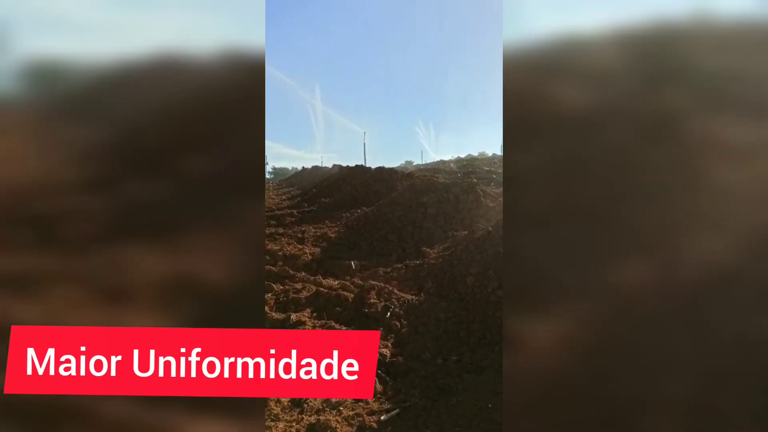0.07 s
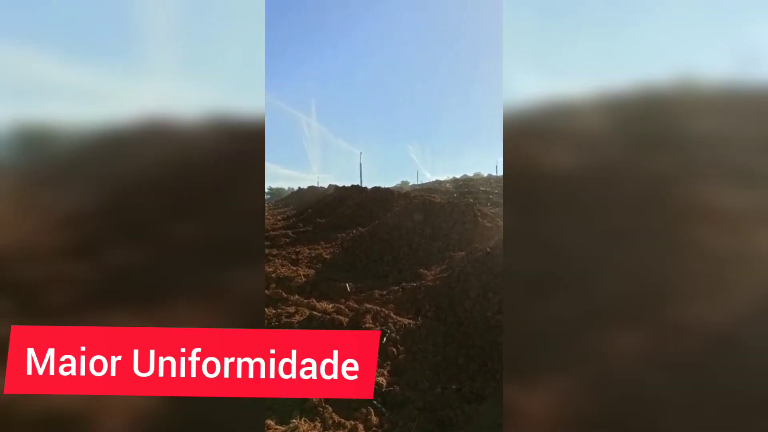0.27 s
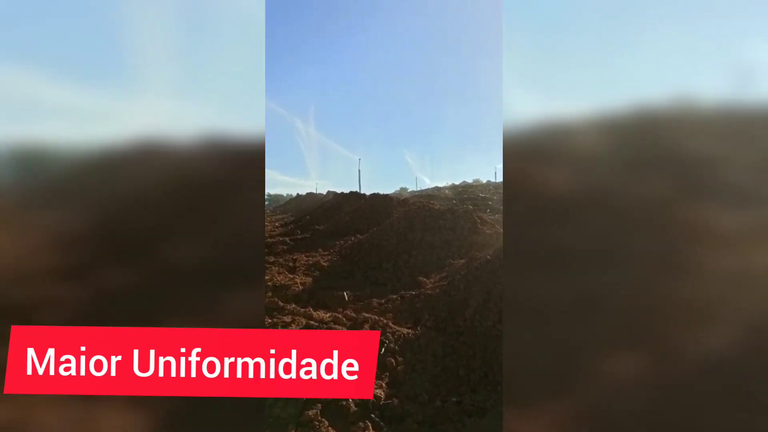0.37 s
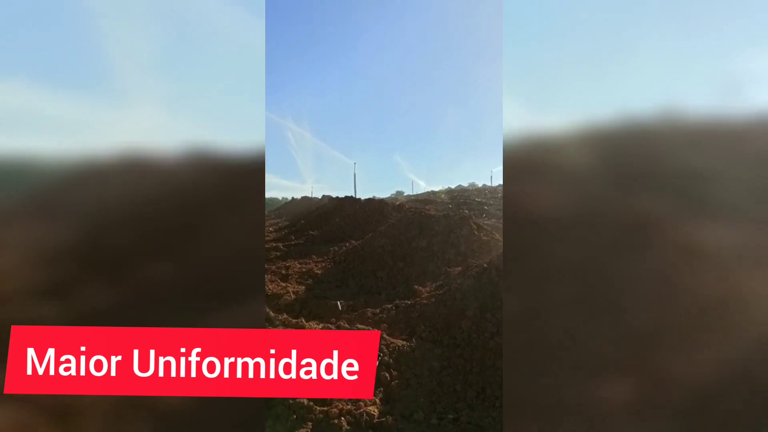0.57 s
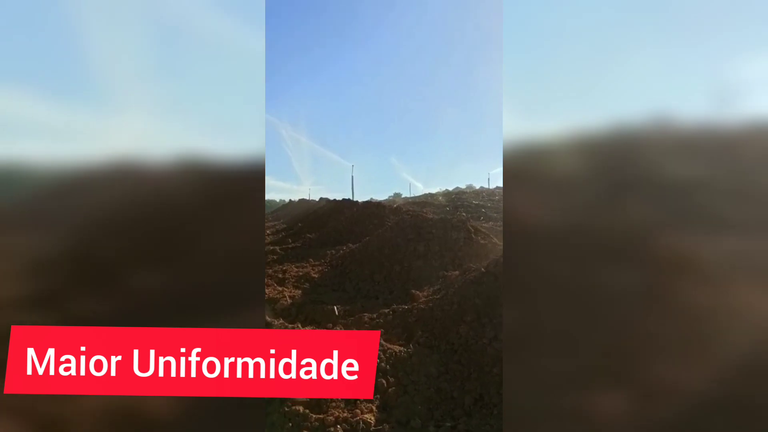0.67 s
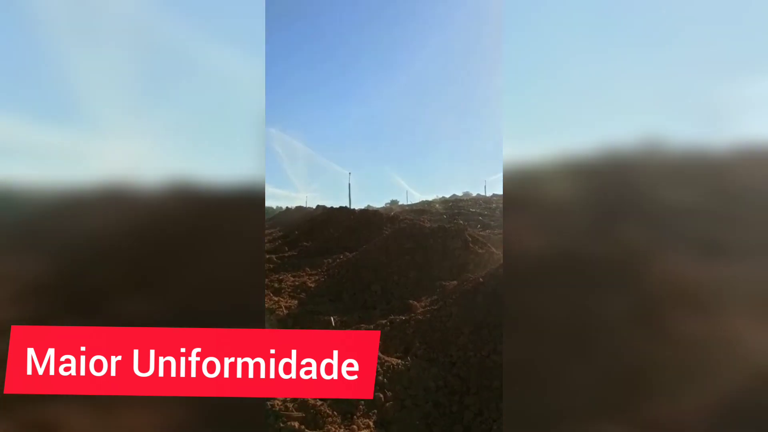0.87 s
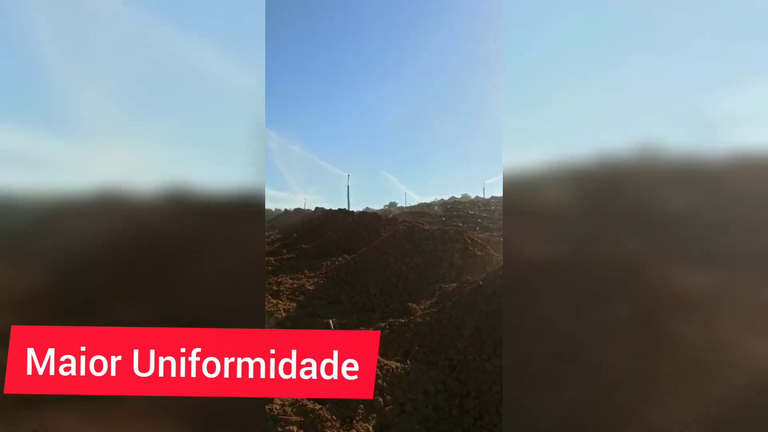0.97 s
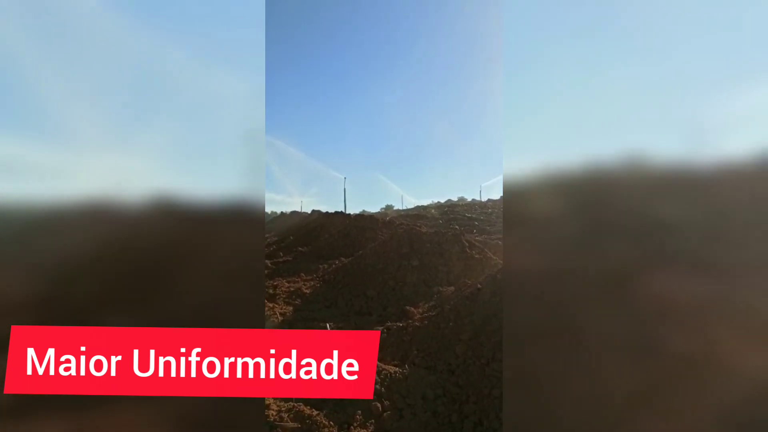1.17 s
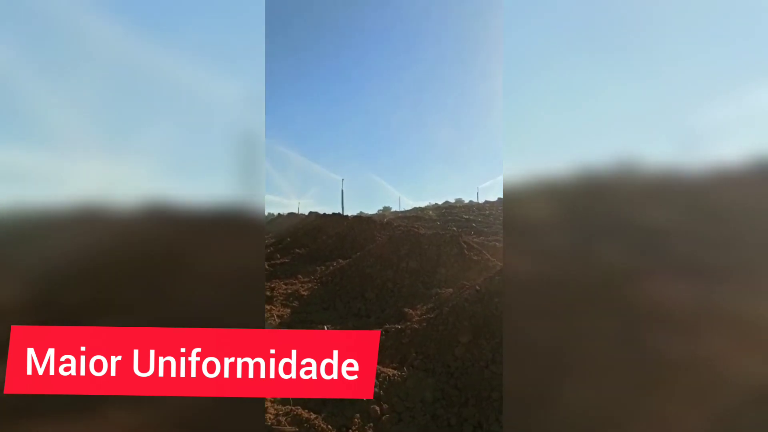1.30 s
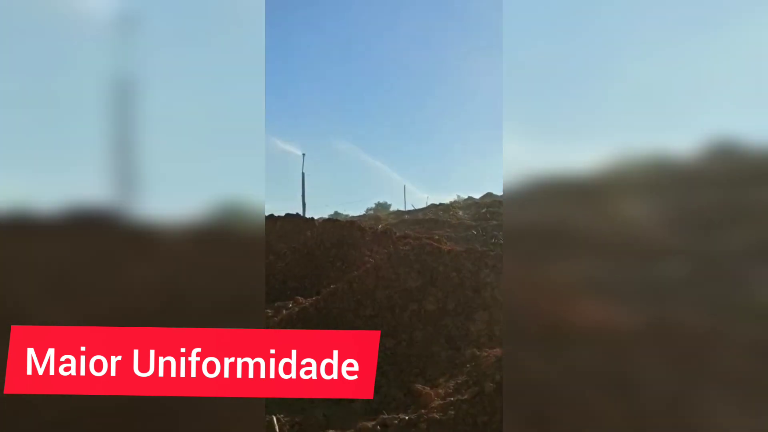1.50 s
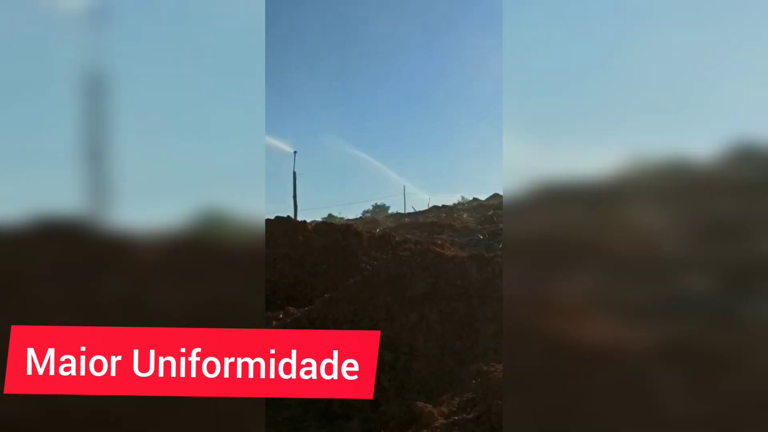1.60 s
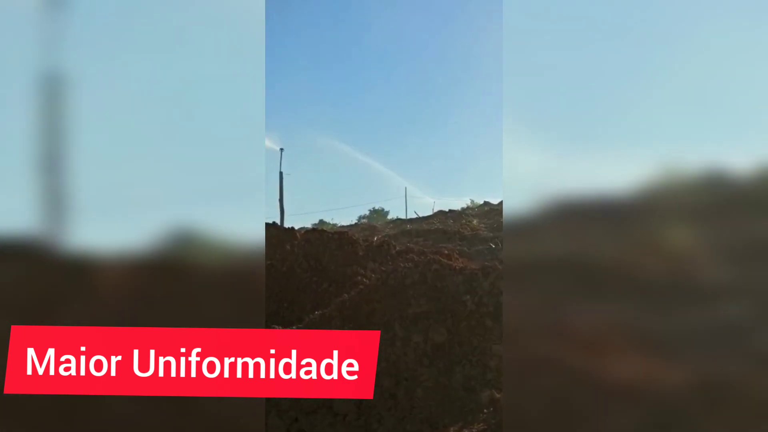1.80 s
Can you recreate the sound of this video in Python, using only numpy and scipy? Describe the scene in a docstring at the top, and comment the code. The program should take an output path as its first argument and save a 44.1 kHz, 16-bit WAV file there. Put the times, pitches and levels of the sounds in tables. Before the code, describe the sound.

An impact sprinkler hisses in an open field, its arm slapping the jet with short ticks three times a second from 0.2 to 1.8 seconds. Bright spray sizzles for the first half second. At 0.2 seconds a finger thuds and rubs over the right microphone, leaving that side muffled with low rumble and small bumps, a stronger one at 1.1 seconds. The hiss swells slightly near the end.

```python
"""Impact sprinkler in a field

The jet hisses over open ground, and three times a second the swinging arm slaps through it.
A bright spray sizzles for the first half second. A finger slides over the right microphone and
stays there, so that side goes dull, leaving the hand's bumps and low rumble over a faint hiss."""
import sys
import numpy as np
from scipy.fft import rfft, irfft
from scipy.io import wavfile

SR = 44100
rng = np.random.default_rng(int(sys.argv[2]) if len(sys.argv) > 2 else 0)


def file_out(sig):
    """Save sig as 16-bit WAV at sys.argv[1]."""
    # one column per channel
    cols = np.atleast_2d(sig).T
    # limit, then scale
    lim = np.clip(cols, -1, 1)
    pcm = np.round(lim * 32767).astype(np.int16)
    wavfile.write(sys.argv[1], SR, pcm)


N = 81585
T = np.arange(N) / SR
HZ = np.maximum(np.arange(N // 2 + 1) * SR / N, 1)

# Tone of the field's air and of each water layer. Each row: frequency in Hz, level in dB.
FIELD_EQ = [(20, -100), (45, -119), (70, -95), (100, -84.5), (200, -81.5), (330, -81), (600, -83.5),
            (900, -83), (1200, -87), (1700, -86), (2300, -91), (4000, -90), (9000, -108)]
JET_EQ = [(1500, -105), (2800, -98), (3500, -93), (4650, -90.5), (4950, -100.5), (5800, -92.5), (6400, -87),
          (7500, -85.5), (8500, -88.5), (11700, -95.5), (13200, -92.5), (15700, -95)]
SPRAY_EQ = [(2500, -105), (3400, -86), (4400, -84), (5100, -85.5), (6000, -81.5), (6400, -78.5),
            (7400, -70), (7900, -74), (8450, -76), (11700, -77), (13100, -74.5), (14200, -79), (15700, -80)]
SLAP_EQ = [(200, -98), (500, -76), (1000, -80.5), (2400, -80.5), (3300, -71), (4500, -68.5), (5000, -69.5),
           (5600, -70.5), (6400, -66), (7600, -69), (8500, -71.5), (11700, -84), (15700, -80)]
SPIT_EQ = [(5000, -105), (8000, -93), (12000, -88), (15700, -90)]
# Narrow resonances in all the water. Each row: centre in Hz, width in Hz, boost in dB.
WATER_PEAKS = [(3250, 63, 3), (4530, 100, 3.5), (6457, 53, 6.5), (6686, 53, 7), (6910, 41, 2),
               (7520, 120, 3.5), (7650, 73, 2), (8250, 87, 5.5)]
# Fader rides for jet, spray and muffled hiss. Each row: time in seconds, level in dB.
JET_FADER = [(0, 2.5), (.17, 11), (.23, 10), (.5, 2.5), (.58, 2), (1.05, 1.5), (1.4, 3), (1.7, 5.5),
             (1.85, 7)]
SPRAY_FADER = [(0, 0), (.24, -2), (.35, 2), (.515, 0.5), (.55, -30), (.65, -48), (1.85, -40)]
MUFFLED_FADER = [(0, 2), (.45, -9), (.6, -5), (.9, 0), (1.3, -0.5), (1.85, -1)]
# Cues for the arm's slaps and spits and the grip's rustles. Each row: start in seconds, level in dB.
SLAP_CUES = [(0.176, -5.5), (0.5195, -2.5), (0.853, -3.5), (1.1808, -3.5), (1.5187, -3.5), (1.837, -3.5)]
SPIT_CUES = [(.686, -0.5), (.862, 1), (1.013, 3.5), (1.674, 11.5)]
RUSTLE_CUES = [(0.166, 3.5), (0.861, 2.5), (.95, 2.5), (1.07, 7.5), (1.118, 2.5)]
# Tone of the muffled hiss and of each hand noise. Each row: frequency in Hz, level in dB.
MUFFLED_EQ = [(300, -98), (1000, -102), (2700, -108), (4600, -106), (5000, -116), (5900, -115),
              (6400, -110), (8400, -117), (11700, -113), (13200, -108), (14700, -106), (15700, -111)]
RUSTLE_EQ = [(40, -96), (100, -84), (250, -70), (450, -80), (900, -84), (2000, -100)]
RUMBLE_EQ = [(20, -118), (45, -86), (68, -63.5), (90, -62.5), (115, -66.5), (150, -75), (230, -79.5),
             (380, -91.5), (550, -94), (1000, -104), (3000, -120)]
BRUSH_EQ = [(100, -65), (350, -53), (700, -63), (1200, -68), (2000, -69.5), (4500, -74.5), (8000, -108),
            (15000, -105)]
RUB_EQ = [(25, -77), (60, -45), (110, -49), (200, -51), (350, -57.5), (600, -67.5), (1000, -80),
          (2000, -96.5), (5000, -105), (12000, -122)]
SCUFF_EQ = [(100, -65), (250, -49.5), (700, -57), (1100, -70.5), (2000, -75.5), (4500, -85), (8000, -112),
            (15000, -122)]
# The finger bumps the microphone. Each row: start in seconds, thud level in dB, thud pitch in Hz,
# knock level in dB, scuff level in dB.
BUMP_CUES = [(0.2247, -1, 106, -16.5, 5), (.266, -25.5, 98, -29, -18), (.313, -19.5, 105, -42, -24),
             (0.395, -31, 105, -47, -26), (0.426, -25.5, 85.6, -48, -23.5), (0.557, -36.5, 93, -49, -41),
             (0.715, -34, 110, -48, -36), (0.836, -26, 91.3, -44, -30), (0.956, -33.5, 75, -55, -46),
             (1.091, -25, 99, -44, -38), (1.104, -11, 77.7, -13, -6.5), (1.144, -33.5, 91, -47, -24),
             (1.185, -36.5, 75, -49, -40), (1.286, -25, 115, -35.5, -15.5), (1.321, -34.5, 123, -43.5, -32),
             (1.532, -49, 96, -36.5, -35)]
# The ring of the knocked case. Each row: pitch in Hz, level in dB relative to the knock.
CASE_RING = [(225, -1.5), (352, -1), (700, -19.5), (945, -27.5)]
# The right microphone's own colour. Each row: frequency in Hz, gain in dB.
RIGHT_EQ = [(2000, 4), (4000, 4), (5500, 6), (6300, 7), (6800, 7), (7600, 8), (8300, -14), (13000, 2.5),
            (14600, 11), (15700, 8)]
# The finger shuts the direct path to that microphone. Each row: time in seconds, gain in dB.
RIGHT_FADER = [(0, -0.5), (.195, -2.5), (.225, -23), (.26, -43), (.37, -61), (1.85, -60)]
# A treble scoop across the whole mix. Each row: frequency in Hz, gain in dB.
MASTER_EQ = [(8480, 1), (8680, -13), (10500, -19.5), (11350, -32), (11560, 0.5)]


def from_db(db):
    """Decibels to gain."""
    return 10 ** (np.asarray(db) / 20)


def fader(points):
    """A gain ride through points of time and dB."""
    return from_db(np.interp(T, *np.transpose(points)))


def eq(x, curve):
    """Shape the tone with a dB curve drawn on a log-frequency axis."""
    hz, db = np.transpose(curve)
    return irfft(rfft(x) * from_db(np.interp(np.log(HZ), np.log(hz), db)), N)


def white(channels=1):
    """White noise at 0 dB per Hz."""
    return np.squeeze(rng.standard_normal((channels, N))) * np.sqrt(SR / 2)


def flutter(rate_hz, spread_db):
    """A randomly wavering gain, moving mostly slower than rate_hz."""
    wander = irfft(rfft(white()) / (1 + (HZ / rate_hz) ** 2), N)
    return from_db(spread_db * wander / wander.std())


def burst(start, db, attack, t60, hold=0):
    """An envelope that rises to db, holds, then falls 60 dB every t60; times in seconds."""
    age = T - start
    release_db = -60 * np.maximum(age - attack - hold, 0) / t60
    return np.clip(age / attack, 0, 1) * from_db(db + release_db)


def field_air():
    """A soft, wide bed of open-air noise."""
    return eq(white(channels=2), FIELD_EQ)


def splatter(drops_per_s=6000, drop_share=0.46):
    """Turbulent hiss blended with countless droplet clicks."""
    drops = (rng.random(N) < drops_per_s / SR) * rng.choice([-1, 1], N)
    drops = drops * from_db(0.5 * np.minimum(rng.exponential(1, N), 5))
    return np.sqrt(1 - drop_share) * white() + np.sqrt(drop_share * SR / 2) * drops / drops.std()


def water(curve, likeness=0.56, right_lag_s=0.00014):
    """Fluttering, resonant splatter in stereo: the right side is partly alike and slightly late."""
    left = splatter()
    right = likeness * np.roll(left, round(right_lag_s * SR)) + np.sqrt(1 - likeness ** 2) * splatter()
    boost_db = sum(db / (1 + (2 * (HZ - hz) / width) ** 2) for hz, width, db in WATER_PEAKS)
    resonant = irfft(rfft([left, right]) * from_db(boost_db), N)
    return eq(resonant, curve) * flutter(rate_hz=81, spread_db=1)


def jet():
    """The water jet hisses throughout, swelling and easing."""
    return fader(JET_FADER) * water(JET_EQ)


def spray():
    """Bright spray sizzles, then drops away after half a second."""
    return fader(SPRAY_FADER) * water(SPRAY_EQ)


def muffled_hiss():
    """The faint hiss that remains under the finger."""
    return fader(MUFFLED_FADER) * eq(white(), MUFFLED_EQ)


def arm_slaps():
    """The arm chops the jet, which frays just before each hit and trails scattered drops after."""
    hits = sum(burst(start, db, attack=0.006, hold=0.004, t60=0.028) for start, db in SLAP_CUES)
    trails = sum(burst(start - 0.018, db - 10.5, attack=0.029, t60=0.12) for start, db in SLAP_CUES)
    return (hits + trails) * water(SLAP_EQ)


def grip_rustles():
    """Soft, dull rustles as the hand shifts on the case."""
    shifts = sum(burst(start, db, attack=0.0027, hold=0.0073, t60=0.17) for start, db in RUSTLE_CUES)
    return shifts * eq(white(), RUSTLE_EQ)


def hand_rumble(fade_in_s=0.224):
    """The hand's unsteady low end comes in with the finger and stays."""
    fade_in = np.clip(T / fade_in_s, 0, 1) ** 4
    return fade_in * flutter(rate_hz=36, spread_db=1.5) * eq(white(), RUMBLE_EQ)


def finger_landing(touch_s=0.2166, click_hz=2200, click_t60=0.00083):
    """Skin brushes the edge of the microphone port, then touches down with a tiny click."""
    brush = burst(start=0.1932, db=3.5, attack=0.028, t60=0.056) * eq(white(), BRUSH_EQ)
    age = np.maximum(T - touch_s, 0)
    click = from_db(-2.5 - 60 * age / click_t60) * np.sin(2 * np.pi * click_hz * age)
    return brush + click


def finger_rub():
    """The finger slips unevenly into place with a rough, bassy rub."""
    slide = burst(start=0.224, db=-0.5, attack=0.016, hold=0.091, t60=0.054)
    return slide * flutter(rate_hz=33, spread_db=4) * eq(white(), RUB_EQ)


def soft_ring(start, rise, hz, push=0):
    """A damped ring set off by a soft contact; push adds a pulse of plain pressure."""
    out = np.zeros(N)
    live = (T > start) & (T < start + 20 * rise)
    age = T[live] - start
    envelope = age / rise * np.exp(1 - age / rise)
    out[live] = -envelope * (np.sin(2 * np.pi * hz * age) + push)
    return out


def finger_bumps(knock_delay_s=0.00408):
    """Each bump stacks a low thud, a knock of the case and a scuff of skin."""
    out = np.zeros(N)
    skin = eq(white(), SCUFF_EQ)
    for start, thud_db, thud_hz, knock_db, scuff_db in BUMP_CUES:
        out += from_db(thud_db) * soft_ring(start, rise=0.48 / thud_hz, hz=thud_hz, push=0.12)
        for hz, db in CASE_RING:
            out += from_db(knock_db + db) * soft_ring(start + knock_delay_s, rise=0.003, hz=hz)
        out += burst(start - 0.0011, scuff_db, attack=0.0045, t60=0.068) * skin
    return out


def arm_spits():
    """Thin spits of water as the arm swings back between slaps."""
    spits = sum(burst(start, db, attack=0.0021, hold=0.0031, t60=0.06) for start, db in SPIT_CUES)
    return spits * water(SPIT_EQ)


def scene():
    """The left microphone stays open; the right one ends up under the finger."""
    left, right = jet() + spray() + arm_slaps() + arm_spits() + field_air()
    right = fader(RIGHT_FADER) * eq(right, RIGHT_EQ) + muffled_hiss()
    left += grip_rustles()
    right += finger_rub() + hand_rumble() + finger_landing() + finger_bumps()
    return np.array([left, right])


def record(dry, cutoff_hz=15900):
    """Master chain: scoop the treble around 10 kHz, soft-clip the peaks, cut the very top."""
    scooped = eq(dry, MASTER_EQ)
    rounded = scooped / (1 + scooped ** 8) ** (1 / 8)
    return irfft(rfft(rounded) / np.sqrt(1 + (HZ / cutoff_hz) ** 400), N)


dry = scene()
out = record(dry)
file_out(out)
```